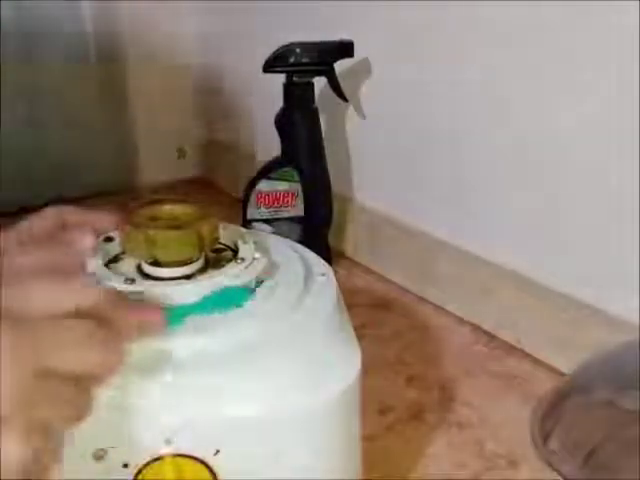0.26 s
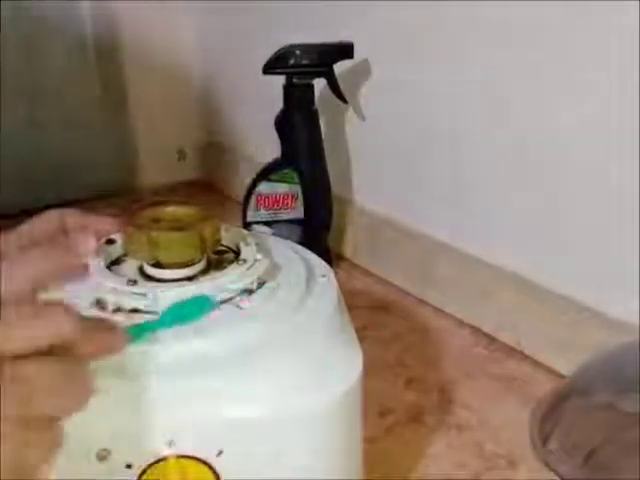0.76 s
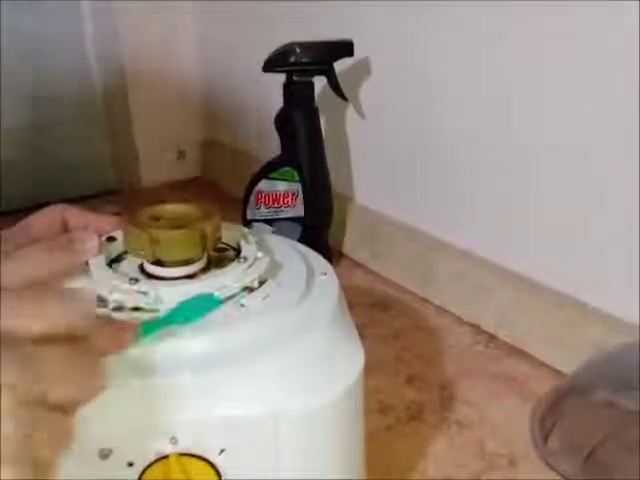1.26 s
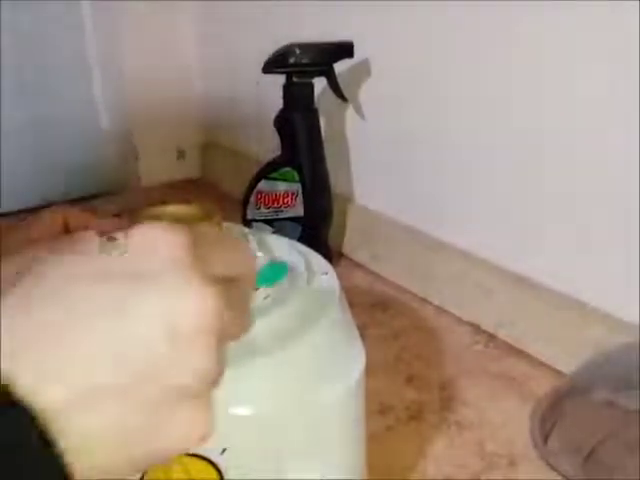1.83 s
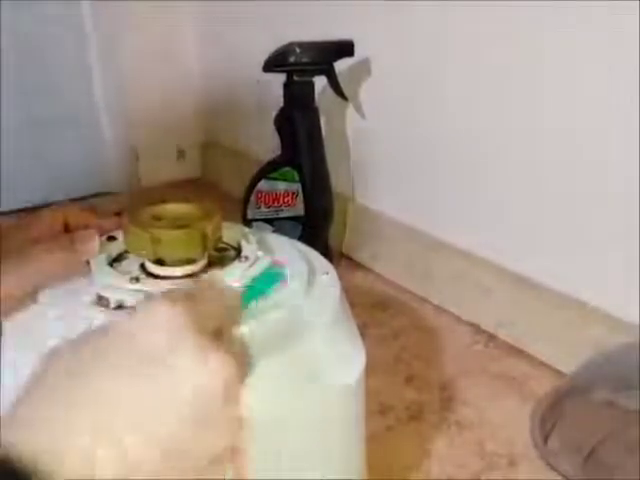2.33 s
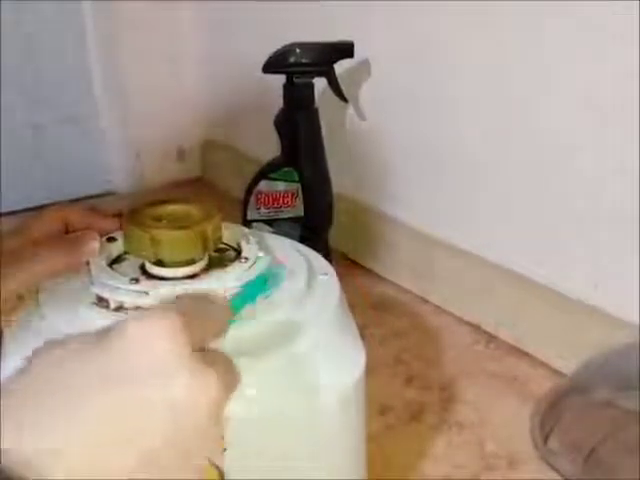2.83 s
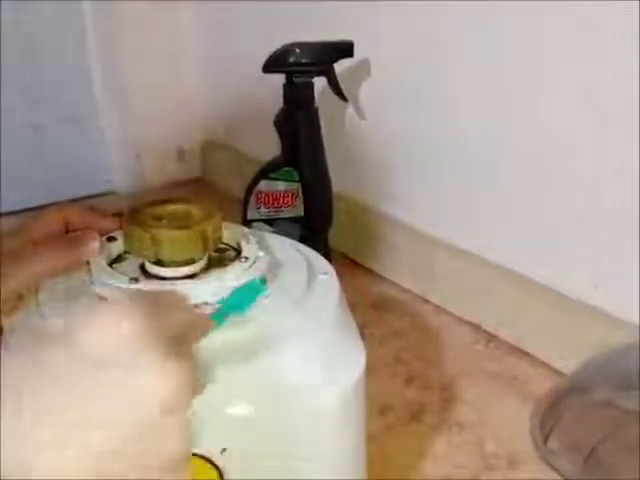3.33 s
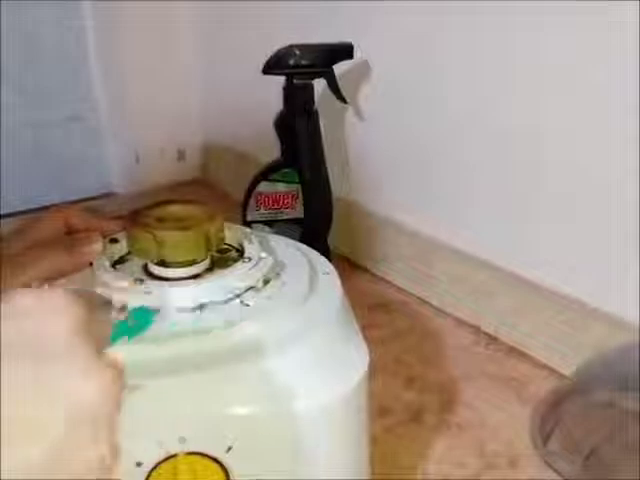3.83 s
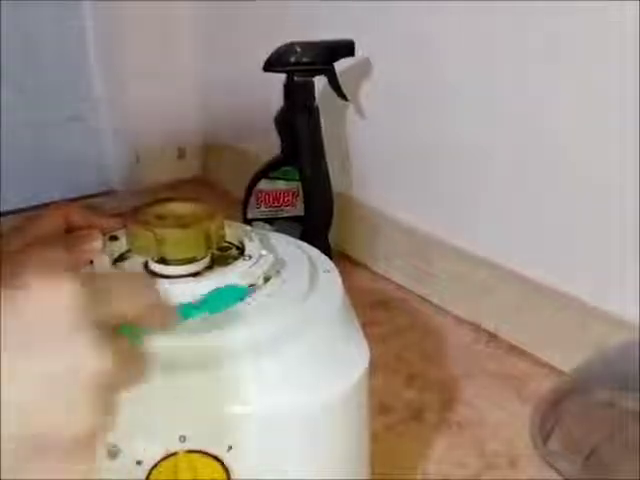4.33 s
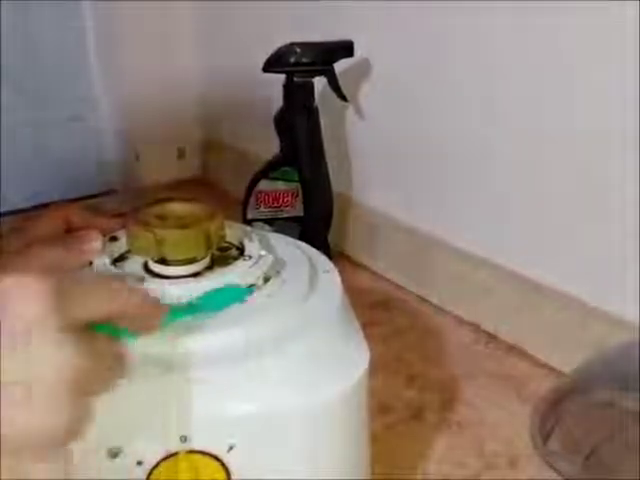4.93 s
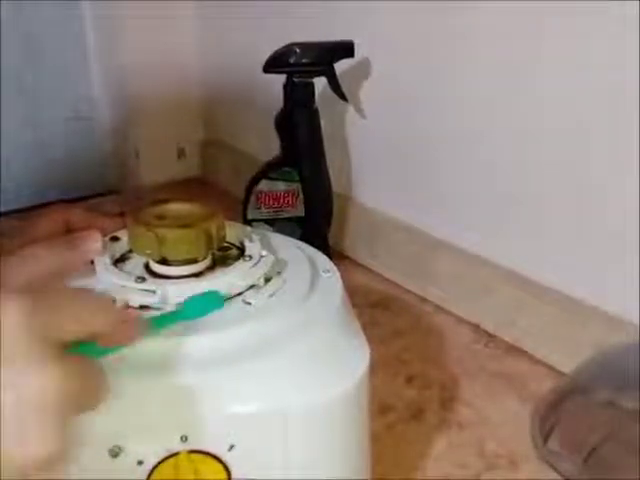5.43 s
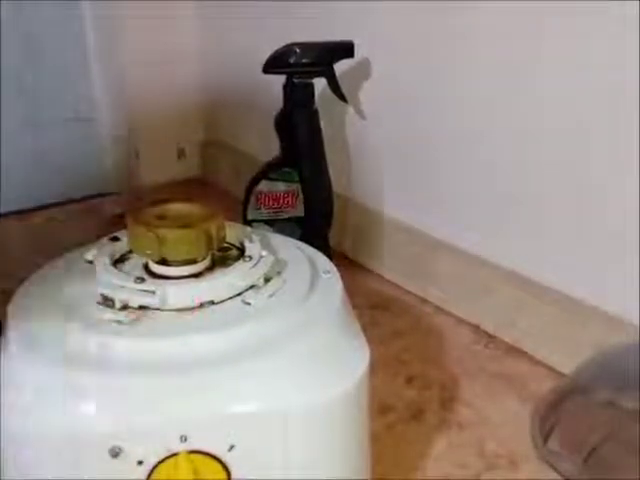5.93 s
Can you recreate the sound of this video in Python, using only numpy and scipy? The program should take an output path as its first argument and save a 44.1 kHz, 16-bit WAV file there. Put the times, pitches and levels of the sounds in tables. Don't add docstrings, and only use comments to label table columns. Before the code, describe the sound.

A stiff toothbrush scrubs a hollow plastic appliance base in quick dry strokes, bristles crackling, the head knocking ribs, in a small hard kitchen.

```python
import sys
import numpy as np
from scipy import signal
from scipy.fft import rfft, irfft
from scipy.io import wavfile
from scipy.ndimage import uniform_filter1d

SR = 44100
rng = np.random.default_rng(int(sys.argv[2]) if len(sys.argv) > 2 else 0)


def gain_from_db(level_db):
    decades = np.asarray(level_db, float) / 20
    return 10 ** decades


def file_out(sig):
    cols = np.atleast_2d(sig).T
    lim = np.clip(cols, -1, 1)
    pcm = np.round(lim * 32767).astype(np.int16)
    wavfile.write(sys.argv[1], SR, pcm)


N = 272979

# [t/s, crackle
# level/dB, rise/s per 10 dB, fall/s per 10 dB]
STROKES = [(0.066, -54.5, -2, 0.1), (0.252, -52.5, 0.1, -0.01), (0.379, -48.5, 0.15, -0.01),
           (0.425, -57, 0.2, -0.1), (0.514, -49, 0.08, -0.06), (0.547, -48.5, 0.12, -0.01),
           (0.813, -48, 0.17, -0.01), (0.893, -48.5, 0.15, 0.07), (1.05, -49.5, 0.1, 0.06),
           (1.171, -48, 0.04, 0), (1.292, -50.5, 0.05, 0.06), (1.355, -56, 0.28, 0),
           (1.591, -48, 0.08, 0.03), (1.678, -65.5, 0.36, -0.02),
           (1.937, -54, 0.017, 0.025), (2.022, -49.5, 0.054, 0.13), (2.166, -45, 0.075, 0.021),
                  (2.265, -37.5, 0.016, 0.064), (2.31, -41.5, 0.011, 0.031), (2.424, -32.5, 0.036, 0.038),
                  (2.533, -41.5, 0.02, 0.052), (2.586, -49.5, 0.16, 0.013), (2.67, -39.5, 0.032, 0.051),
                  (2.717, -40, 0.0096, 0.0045), (2.784, -41, 0.023, 0.097), (2.905, -40.5, 0.023, 0.035),
                  (2.935, -36, 0.0093, 0.019), (3.072, -40.5, 0.095, 0.022), (3.175, -36, 0.039, 0.035),
                  (3.313, -38.5, 0.055, 0.046), (3.453, -38.5, 0.048, 0.04), (3.565, -35.5, 0.033, 0.013),
                  (3.616, -29.5, 0.017, 0.048), (3.65, -30.5, 0.031, 0.05), (3.865, -43.5, 0.054, 0.022),
           (4.26, -51, 0.036, 0.029), (4.344, -54, 0.0086, 0.061), (4.502, -35, 0.021, 0.04),
                   (4.67, -53, 0.1, 0.038), (4.807, -40.5, 0.04, 0.038), (4.934, -50.5, 0.041, 0.071),
                   (5.095, -39, 0.011, 0.031), (5.234, -47, 0.026, 0.043), (5.341, -48, 0.014, 0.076),
                   (5.387, -35, 0.015, 0.029), (5.545, -51.5, 0.067, 0.032), (5.641, -38, 0.014, 0.03),
                   (5.713, -44, 0.068, 0.023), (5.84, -74.5, 0.076, 0.087)]
# [t/s, crackle level/dB, fall/s per 10 dB]
REBOUNDS = [
    (0.6, -42.5, -0.02),
    (0.654, -46, -0.06),
    (0.729, -55, -0.1),
    (1.392, -25, -0.02),
    (2.207, -45, 0),
    (3.4, -36.5, 0.09),
    (3.71, -42.5, 0.0763),
    (3.906, -46.5, 0.077),
    (4.113, -69.5, 1.13),
    (5.038, -57, 0.41),
]
# [start t/s, shell level/dB, tips level/dB]
STRETCHES = [
    (0, -2.5, -3.5),
    (.76, -4.5, -1),
    (1.8, -12.5, -7.5),
    (2.5, -6.5, -3.5),
    (3.88, -1, 0),
    (5.78, 1, -23),
]
# [t/s, level/dB]
DRYNESS = [(0, -11), (.4, -9.5), (.7, -4), (1.0, 6), (1.3, 2), (1.45, -10.5), (1.6, 8), (1.95, 8.5),
           (2.3, 0), (2.7, 3), (3.5, -5.5), (3.95, 4.5), (4.1, -11), (4.3, 6.5), (4.6, -3.5), (4.95, 4),
           (5.2, -3.5), (5.7, 2.5)]
# [t/s, crackle dip/dB, shell dip/dB, top hiss dip/dB]
TURNS = [(.03, 3, 2, 10), (.19, 6.5, 6, 4), (.303, 7, 6, 3), (.456, 7, 14, -4), (.534, 1, -5, 2),
         (.584, -3, 1, 3), (.64, -6, -7, 4), (.716, 11, 0, 8), (.861, 8, 16, -2), (.985, 24, 0, 12),
         (1.135, 6, 6.5, 1), (1.215, 12, -2.5, 8.5), (1.34, 2.5, 9, 2.5), (1.507, 11.5, 0, 13),
         (1.975, 2, -1.5, 2), (2.098, 3.5, 7, 7), (2.195, 0, -1, -6), (2.25, 0.5, -3, -2),
         (2.3, 0.5, -1, -1), (2.366, 3, -3, 4), (2.495, 2, 7, 0), (2.624, 0.5, 7, -1), (2.752, 2, 3, 2),
         (2.87, 6.5, 17, -2), (2.985, 4, 2, -2), (3.113, -0.5, 8, -5), (3.242, 3, -9, 0.5),
         (3.38, 4.5, 2.5, -3), (3.51, 3, 3, 3.5), (3.58, 1.5, 1.5, 0.5), (3.75, 3, -1, 8.5),
         (3.81, 0.5, 0, -1.5), (4.065, 13, -2, -4), (4.185, 9, 0, -4), (4.317, -1, 12, 0),
         (4.43, 4, -1, 13), (4.62, 0, 4, 1), (4.73, 7, 0, 6), (4.885, 3, 0, -4), (5.01, 8, -2.5, 7),
         (5.179, 3, 5, -6), (5.312, 10, 1, 6), (5.58, 4, -2, 2)]
# [f/Hz, level/dB per Hz]
SLIP_COLOUR = [(300, -34), (1000, -20.5), (3000, -3.5), (4200, -5), (6200, 4), (8000, -11.5), (11000, 1),
               (16000, 2)]
# [f/Hz, width/Hz, level/dB]
TIP_MODES = [(7300, 460, -2.5), (8050, 660, -0.5), (8510, 2830, -7)]
# [f/Hz, width/Hz, level/dB]
SHELL_MODES = [(510, 30, -11), (657, 23, -10), (844, 51.5, 1.5), (1246.5, 71, 0.5), (1671, 96, -1),
               (2135, 275, -2.5), (2400, 158, -8.5), (3043, 96, -3), (3620, 35, -9.5)]
# [f/Hz, width/Hz, depth/0-1]
SHELL_VALLEYS = [(380, 83, 0.2), (981, 142, 0.6), (1450, 140, 0.11)]
# [t/s, peak level/dB, centre f/Hz, upper shell level/dB, lower shell level/dB]
KNOCKS = [(0.3155, -39, 3740, -37, -37), (0.5417, -30, 3900, -27, -28.5), (0.5926, -30.5, 4200, -40, -34.5),
          (0.7265, -29.5, 3970, -39, -34), (1.3901, -21.5, 4470, -25, -25.5),
          (1.398, -31, 3020, -39, -20.5), (1.412, -42, 2500, -47, -33), (1.4426, -23.5, 2530, -36, -43),
          (2.2075, -38, 4520, -42.5, -40.5), (2.888, -31, 3340, -47, -42),
          (2.9262, -20.5, 6500, -33.5, -62), (3.3988, -26.5, 5460, -42, -42),
          (3.71, -23.5, 4140, -25.5, -26.5), (3.8918, -18, 7160, -22.5, -27), (3.907, -26, 4570, -18, -23),
          (4.1086, -46.5, 3300, -31.5, -33.5), (4.4882, -23.5, 7300, -32, -48),
          (4.547, -36, 4550, -34.5, -53), (4.7934, -35.5, 3270, -39, -34), (5.0362, -37, 3700, -37.5, -41),
          (5.2258, -31.5, 3530, -43, -34.5), (5.43, -29.5, 4400, -39.5, -37),
          (5.6753, -19.5, 3760, -17, -23)]
# [t/s, peak level/dB, centre f/Hz, shell level/dB]
TICKS = [(0.0437, -44, 5700, -55.5), (0.6493, -29.5, 2880, -38.5), (0.917, -23, 5500, -40.5),
         (1.0326, -29, 7800, -67), (1.048, -25, 8500, -71), (1.1596, -36.5, 4270, -48),
         (1.57, -33.5, 5550, -69), (2.3098, -29.5, 5670, -68), (2.425, -26.5, 7100, -71),
         (2.948, -30, 6600, -48), (3.5907, -7.5, 6300, -57), (3.94, -26, 8550, -40),
         (4.3282, -35.5, 8400, -72), (4.583, -32.5, 6300, -38.5), (5.3372, -30, 7300, -52),
         (5.3773, -22.5, 6340, -47), (1.091, -31.5, 8400, -76), (3, -36, 3020, -40.5),
         (2.352, -42, 5470, -66), (2.595, -41, 5630, -72)]
# [t/s, peak level/dB, centre f/Hz]
SNAPS = [(0.4827, -47, 3060), (0.5054, -33, 2310), (0.5129, -30, 2450), (0.8788, -41, 7510),
         (1.2542, -45, 7300), (1.3552, -47.5, 7320), (1.919, -48, 7400), (2.0012, -44, 5910),
         (2.007, -35, 5860), (2.2558, -28, 6000), (2.324, -31, 5300), (2.3844, -30, 4900),
         (2.518, -38, 8210), (2.5883, -31, 7300), (2.6535, -29, 7600), (2.7083, -31, 7300),
         (2.766, -36.5, 7330), (3.024, -31, 7700), (3.129, -36, 5780), (3.144, -28, 4250),
         (3.3044, -27, 5740), (3.5921, -11, 4600), (3.5945, -13, 7350), (4.248, -35, 7390),
         (4.4552, -35, 7500), (4.496, -20, 7300), (4.94, -45, 14800), (4.797, -22.5, 3100),
         (5.199, -35, 7740), (5.6395, -31, 5290), (2.226, -44, 7500), (2.607, -41, 9800),
         (3.354, -30, 12000), (4.087, -42, 7550), (3.7123, -21.5, 3930), (1.225, -42, 8000),
         (1.68, -47, 14500), (3.415, -29, 5200), (2.395, -30, 4870), (0.563, -36, 3500),
         (1.379, -31, 13000), (0.879, -30, 10500), (1.597, -26, 7500), (2.267, -35, 6000)]
# [t/s, level/dB]
FLEXES = [(.545, -36), (.728, -32.5), (1.396, -30), (1.41, -28), (2.89, -34), (3.145, -33), (3.40, -37),
          (3.60, -32), (3.909, -14), (3.925, -25), (4.112, -42), (4.5, -31.5), (4.8, -32.5), (5.04, -36),
          (5.228, -31), (5.68, -32)]
# [t/s, level/dB]
THUDS = [(0.0447, -35.5), (0.54, -41), (0.592, -46), (0.933, -42), (1.168, -41), (1.3916, -41),
         (2.2067, -51), (2.423, -49), (2.888, -47.5), (3.593, -47), (3.892, -42), (3.907, -34),
         (4.107, -56), (4.487, -38.5), (4.547, -38), (4.7929, -41), (5.0349, -42), (5.2263, -40.5),
         (5.43, -42), (0.34, -40.5), (0.722, -40), (2.673, -48), (3.415, -40), (3.67, -38.5), (4.259, -48),
         (4.374, -51), (4.68, -48), (5.088, -40), (5.338, -46), (5.676, -43), (6.137, -59)]
# [f/Hz, width/Hz, level/dB]
COUNTER_MODES = [(145, 34, -0.5), (200.3, 47.6, 0.5), (249.5, 21.3, 4)]
# [t/s, level/dB, slope/ms per 10 dB]
ROCKING = [(0.05, -47, 11), (0.178, -54, 25), (0.291, -50, 56), (0.351, -52, 49), (0.553, -50, 21),
           (0.607, -46, 12), (0.664, -50, 42), (0.734, -54, 32), (0.798, -55, 27), (0.942, -50.5, 26),
           (1.084, -55, 30), (1.177, -48, 15), (1.315, -59.5, 48), (1.411, -35.5, 20), (1.6, -58, 48),
           (2.217, -52, 18), (2.432, -56, 49), (2.57, -55, 38), (2.682, -66, 35), (2.826, -54.5, 42),
           (2.925, -50.5, 53), (3.011, -54, 17), (3.071, -53.5, 31), (3.169, -50.5, 45), (3.267, -56, 25),
           (3.348, -52.5, 33), (3.426, -57, 14), (3.482, -53, 44), (3.606, -58, 35), (3.682, -45.3, 39),
           (3.761, -46.5, 27), (3.853, -58, 37), (3.914, -45, 21), (4.124, -49.5, 13), (4.27, -56, 44),
           (4.382, -58, 28), (4.51, -50, 16), (4.558, -50, 26), (4.689, -58, 40), (4.807, -49.5, 32),
           (4.975, -58, 32), (5.045, -56, 9), (5.1, -48.5, 12), (5.162, -50, 16), (5.236, -51, 36),
           (5.346, -59, 23), (5.402, -47, 33), (5.442, -50, 53), (5.691, -48.5, 36), (6.152, -57, 42)]
# [f/Hz, time to fall 60 dB/s]
ROOM_DECAY = [(200, 0.24), (1000, 0.32), (3000, 0.24), (8000, 0.2), (15000, 0.16)]
# [t/s, f/Hz, level/dB]
FOOT_GROANS = [
    [(.14, 740, -75), (.17, 640, -57), (.21, 600, -63), (.27, 627, -65)],
    [(.685, 600, -72), (.70, 540, -44.5), (.74, 523, -64), (.80, 580, -64), (.85, 656, -66)],
    [(3.712, 1210, -25), (3.722, 1070, -42), (3.735, 925, -51), (3.76, 620, -60)],
]
GROAN_WIDTHS = (63, 67, 24)
# [t/s, deep sway level/dB, higher sway level/dB]
RUMBLE = [(0.22, -77, -54), (0.36, -92, -56), (0.64, -71, -57.5), (0.86, -71, -53), (1.19, -75, -67),
          (1.45, -70, -58), (3.19, -55, -78), (3.41, -74, -62.5), (3.69, -57, -70), (3.79, -78, -60),
          (4.77, -81, -68), (5.09, -64, -75), (5.43, -79.5, -68), (5.69, -74, -63), (6.119, -87, -67.5)]
# [t/s, f/Hz, level/dB]
WHISTLE = [
    (5.89, 2150, -90),
    (5.91, 2180, -76),
    (5.98, 2150, -73),
    (6.02, 2120, -84),
    (6.06, 2150, -88),
    (6.08, 2150, -78),
    (6.13, 2150, -90),
]
# [f/Hz, width/Hz, depth/0-1]
PORT_NOTCH = (6620, 420, .75)
# [f/Hz, level/dB]
PORT_COLOUR = [(30, -10), (120, -4), (8000, 3.5), (9200, -3.5), (11300, -12), (13900, -15), (14950, -1),
               (15600, -7), (16100, -63.5)]
# [f/Hz, level/dB per Hz]
HUSH_COLOUR = [(15, -38), (25, -15.5), (48, -18.5), (113, -4), (291, -19), (449, -19), (486, -20.5),
               (710, -28.5), (1220, -19.5), (1680, -27.5), (2090, -27.5), (7630, -32), (9720, -40.5),
               (13100, -33.5), (15500, -38.5)]
# [f/Hz, level/dB per Hz]
HISS_COLOUR = [(30, -7.5), (200, -6), (1000, -8.5), (4000, -13.5), (12000, -23.5), (15500, -17.5),
               (16200, -62)]

USUAL_DB = -45.5
SHELL_LAG, TIPS_LAG = 0.36, 0.21
TIPS_PER_DRY = 0.49
SPRING_S, SPRING_SHELL_DB, SPRING_TIPS_DB = 0.0015, 1.5, -2
ROUNDNESS = 1.276
LIFT_START_S, LIFT_END_S, LIFT_FADE_S = 1.69, 1.9, 0.012
STALL_S = 0.016
GRIP_HZ = 42.2
WANDER_DB = 2
SNAP_DB, SNAP_SHELL_DB = -4, -26
TICK_SHORT, SNAP_SHORT = 0.93, 0.96


def evened(x):
    return x / np.sqrt(np.mean(x ** 2) + 1e-20)


def read(points, hz):
    f, value = np.transpose(points)
    return np.interp(np.log(hz + 1), np.log(f + 1), value)


def follow(points):
    return np.interp(np.arange(N) / SR, *np.transpose(points))


def add(mix, s, sound):
    part = mix[round(s * SR):][:len(sound)]
    part += sound[:len(part)]


def resonate(x, hz, width):
    r = np.exp(-np.pi * abs(width) / SR)
    if np.isscalar(hz):
        return 2 * signal.lfilter([1 - r], [1, -r * np.exp(2j * np.pi * hz / SR)], x).real
    turn = np.exp(2j * np.pi * np.cumsum(hz) / SR)
    return 2 * (turn * signal.lfilter([1 - r], [1, -r], x * turn.conj())).real


def ring(x, modes):
    return sum((-1) ** k * gain_from_db(db) * resonate(x, hz, width) for k, (hz, width, db) in enumerate(modes))


def colour(x, points):
    return irfft(rfft(x) * gain_from_db(read(points, np.fft.rfftfreq(len(x), 1 / SR))), len(x))


def slips(per_s, spread_db):
    out = np.zeros(N)
    at = np.flatnonzero(rng.random(N) < per_s / SR)
    size = gain_from_db(spread_db * np.minimum(rng.exponential(1, len(at)), 5))
    out[at] = size * np.sign(rng.random(len(at)) - 0.5)
    return evened(out)


def swells(s, db, rise, fall, shape=1):
    t = np.arange(0, N + 64, 64) / SR
    off = t[:, None] - s
    slope = np.where(off < 0, abs(rise), abs(fall))
    power = gain_from_db(db - 10 * (abs(off) / slope) ** shape) ** 2
    return np.interp(np.arange(N) / SR, t, np.sqrt(power.sum(1)))


def pressure():
    rebounds = [(s, db, SPRING_S, fall) for s, db, fall in REBOUNDS]
    s, db, rise, fall = np.transpose(STROKES + rebounds)
    since, shell_db, tips_db = np.transpose(STRETCHES)
    where = np.searchsorted(since, s) - 1
    sprung = rise == SPRING_S
    shell_db = shell_db[where] - SHELL_LAG * (db - USUAL_DB) + SPRING_SHELL_DB * sprung
    tips_db = tips_db[where] - TIPS_LAG * (db - USUAL_DB) + SPRING_TIPS_DB * sprung
    tips_db = tips_db + TIPS_PER_DRY * np.interp(s, *np.transpose(DRYNESS))
    t = np.arange(N) / SR
    outside_lift = np.maximum(LIFT_START_S - t, t - LIFT_END_S)
    touch = np.clip(outside_lift / LIFT_FADE_S + 1, 0.02, 1)
    return [touch * swells(s, db + gain_db, rise, fall, ROUNDNESS) for gain_db in (0, shell_db, tips_db)]


def stalls():
    s, *dips_db = np.transpose(TURNS)
    t = np.arange(0, N + 64, 64) / SR
    slow = np.exp(-((t[:, None] - s) / STALL_S) ** 2 / 2)
    return [np.interp(np.arange(N) / SR, t, gain_from_db(-slow @ db)) for db in dips_db]


def tufts(low_hz, high_hz, cycles, per_s, spread_db):
    t, out = np.arange(400) / SR, np.zeros(N)
    for hz in np.geomspace(low_hz, high_hz, 12):
        twang = t * np.exp(-t * hz * 2 * np.pi / cycles) * np.sin(2 * np.pi * hz * t)
        out += signal.oaconvolve(slips(per_s, spread_db), evened(twang))[:N]
    return evened(out)


def patchy(x, depth_db):
    z = signal.stft(x, SR, nperseg=512)[2]
    patches = uniform_filter1d(rng.standard_normal(z.shape), size=5, axis=0)
    patches = uniform_filter1d(patches, size=6, axis=1)
    gain = gain_from_db(depth_db * evened(patches))
    return signal.istft(z * evened(gain), SR, nperseg=512)[1][:N]


def brush():
    crackle, force, tips = pressure()
    slow, soft, dull = stalls()
    crackle, force, tips = crackle * slow, force * soft, tips * slow
    clumps = gain_from_db(2.0 * evened(uniform_filter1d(rng.standard_normal(N), size=300)))
    bite = crackle / uniform_filter1d(crackle, size=8000)
    scrape = slips(per_s=4000, spread_db=1.5) * force * bite ** 0.13
    broad = evened(colour(slips(per_s=17000, spread_db=-4.0), SLIP_COLOUR)) * np.sqrt(crackle * tips)
    airy = broad - resonate(resonate(broad, 3600, 9000), 3600, 9000)
    broad += (gain_from_db(follow(DRYNESS)) * dull * bite ** 0.08 - 1) * airy
    twang = gain_from_db(-8.0) * tufts(4090, 7150, cycles=18.0, per_s=460, spread_db=3.0) * crackle
    fizz = gain_from_db(-2.5) * evened(ring(slips(per_s=6000, spread_db=3.5), TIP_MODES)) * tips
    air = patchy(broad + twang + fizz, depth_db=3.5)
    on_counter = gain_from_db(10.5) * uniform_filter1d(scrape, size=60)
    return clumps * np.array([air, gain_from_db(12.0) * scrape, gain_from_db(14.0) * scrape, on_counter])


def shell(scrape, upper, lower):
    now, steps = np.arange(N), np.arange(0, N + 4000, 4000)
    upper = uniform_filter1d(upper, size=3)
    out = gain_from_db(-8.5) * resonate(upper + scrape[0], 2500, 1420)
    out += gain_from_db(-27.5) * resonate(lower + scrape[1], 670, 960)
    for k, (hz, width, db) in enumerate(SHELL_MODES):
        grip = 1 + 0.014 * np.interp(now, steps, rng.standard_normal(len(steps)))
        free = np.interp(now, steps, gain_from_db(WANDER_DB * rng.standard_normal(len(steps))))
        drive = upper + free * scrape[0] if k > 3 else lower + free * scrape[1]
        out += (-1) ** k * gain_from_db(db) * resonate(drive, hz * grip, max(width, GRIP_HZ))
    for hz, width, depth in SHELL_VALLEYS:
        out -= depth * resonate(out, hz, width)
    return out


def knocks():
    out, t = np.zeros((4, N)), np.arange(6000) / SR
    hits = KNOCKS + [tick + tick[-1:] for tick in TICKS]
    hits += [(s, db + SNAP_DB, hz, db + SNAP_SHELL_DB, db + SNAP_SHELL_DB) for s, db, hz in SNAPS]
    shorts = [1] * len(KNOCKS) + [TICK_SHORT] * len(TICKS) + [SNAP_SHORT] * len(SNAPS)
    for (s, db, hz, upper_db, lower_db), short in zip(hits, shorts):
        noise = rng.standard_normal(len(t))
        tick = gain_from_db(-7.5 - 60 * t / 0.002)
        crack = gain_from_db(-60 * t / (0.021 * short))
        rattle = gain_from_db(-12.5 - 60 * t / (0.17 * short))
        burst = noise * np.minimum(t / 0.0003, 1) * (tick + crack + rattle)
        tone = resonate(resonate(burst, hz, 0.5 * hz), hz, 0.72 * hz) + gain_from_db(-14.0) * np.gradient(burst)
        tone += gain_from_db(-5.5) * (hz / 6000) ** 2 * np.gradient(noise * gain_from_db(-60 * t / 0.005))
        tone -= resonate(tone, 450, 1500)
        blow = burst + gain_from_db(6.5) * np.exp(-((t - 0.0004) / 0.00006) ** 2)
        add(out[0], s, gain_from_db(db) * tone / abs(tone).max())
        add(out[1], s, gain_from_db(upper_db + 12) * blow)
        add(out[2], s, gain_from_db(lower_db + 18.0) * burst * np.minimum(t / 0.0034, 1))
    for s, db in FLEXES:
        add(out[2], s, gain_from_db(db + 30.5) * np.gradient(np.exp(-((t - 0.002) / 0.00034) ** 2)))
    for s, db in THUDS:
        add(out[3], s, gain_from_db(db + 41.0) * np.gradient(np.exp(-((t - 0.003) / 0.0011) ** 2)))
    return out


def counter(force):
    return gain_from_db(1.0) * resonate(ring(force, COUNTER_MODES), 190, 300)


def rocking():
    bumps = slips(per_s=550, spread_db=-0.5)
    s, db, slope_ms = np.transpose(ROCKING)
    slope = np.clip(slope_ms, 10, 60) / 1000
    level = swells(s, db, 1.02 * slope, 1.35 * slope, shape=1.69)
    return gain_from_db(-1.0) * level * evened(ring(ring(bumps, COUNTER_MODES), [(163, 92, 0)]))


def rumble():
    s, *levels = np.transpose(RUMBLE)
    out = np.zeros(N)
    for db, rest_db, hz in zip(levels, (-85.5, -85), (50, 92)):
        sway = resonate(resonate(rng.standard_normal(N), hz, 30), hz, 45)
        out += (swells(s, db + 4.0, rise=0.067, fall=0.029) + gain_from_db(rest_db)) * evened(sway)
    return out


def room(x):
    taps = np.zeros(SR // 2)
    at = np.arange(200, SR // 2 - 20, 20)
    taps[at + rng.integers(0, 20, len(at))] = rng.choice([-1., 1.], len(at))
    hz, t, z = signal.stft(taps, SR, nperseg=256)
    decay = gain_from_db(-60 * t / read(ROOM_DECAY, hz)[:, None])
    tail = signal.istft(z * decay, SR, nperseg=256)[1]
    return signal.fftconvolve(x, tail / np.linalg.norm(tail))[:N]


def whine(rows, width, octave_db):
    s, hz, db = np.transpose(rows)
    t, out = np.arange(s[0], s[-1], 1 / SR), np.zeros(N)
    hz, noise = np.interp(t, s, hz), rng.standard_normal(len(t))
    tone = resonate(noise, hz, width) + gain_from_db(octave_db) * resonate(noise, 2 * hz, 3 * width)
    add(out, s[0], gain_from_db(np.interp(t, s, db)) * evened(tone))
    return out


def foot_groans():
    return sum(whine(rows, width, -12.5) for rows, width in zip(FOOT_GROANS, GROAN_WIDTHS))


def whistle():
    return gain_from_db(4.5) * whine(WHISTLE, 39.5, -15)


def scene():
    scrub, (air, upper, lower, thuds) = brush(), knocks()
    near = air + scrub[0] + shell(scrub[1:3], upper, lower)
    near += counter(thuds + scrub[3]) + rocking() + rumble()
    one = near + gain_from_db(-10.5) * room(near) + foot_groans() + whistle()
    return np.array([one, one])


def thin_top(x, low_hz, high_hz, below_db, chance_db):
    hz, _, z = signal.stft(x, SR, nperseg=1024)
    power = abs(z[:512]) ** 2
    recent = uniform_filter1d(power.mean(0), size=5, origin=2)
    recent = np.minimum(recent, np.roll(recent, shift=2))
    bands = uniform_filter1d(power.reshape(64, 8, -1).mean(1), size=2, axis=1)
    band_db = 10 * np.log10(bands / recent + 1e-12)
    luck = evened(uniform_filter1d(rng.standard_normal(band_db.shape), size=3, axis=1))
    weak = np.repeat(band_db + chance_db * luck < below_db, 8, axis=0)
    z[:512] *= 1 - weak * ((hz[:512] > low_hz) & (hz[:512] < high_hz))[:, None]
    return signal.istft(z, SR, nperseg=1024)[1][:N]


def top_cut(x):
    return signal.sosfilt(signal.butter(12, 16810, fs=SR, output="sos"), x)


def record(dry):
    hz, width, depth = PORT_NOTCH
    one = colour(dry[0] - depth * resonate(dry[0], hz, width), PORT_COLOUR)
    one = one + gain_from_db(-71) * evened(colour(rng.standard_normal(N), HUSH_COLOUR))
    one = thin_top(one, low_hz=9600, high_hz=14400, below_db=-20.5, chance_db=3)
    loudness = np.sqrt(abs(uniform_filter1d(one ** 2, size=2000))) / gain_from_db(-59.0)
    hiss = patchy(evened(colour(rng.standard_normal(N), HISS_COLOUR)), depth_db=5)
    hiss = gain_from_db(-76.5) * (1 + loudness) ** 0.21 * hiss
    return top_cut(np.array([one + hiss, one - hiss]))


dry = scene()
out = record(dry)
file_out(out)
```